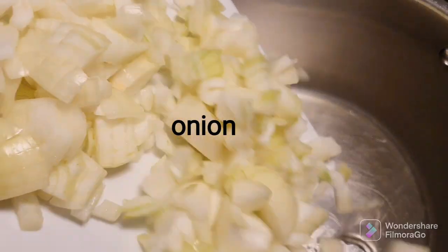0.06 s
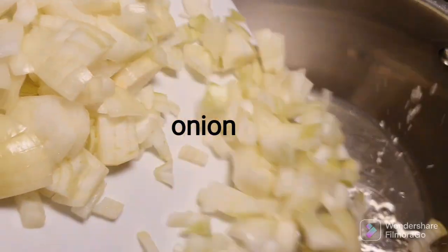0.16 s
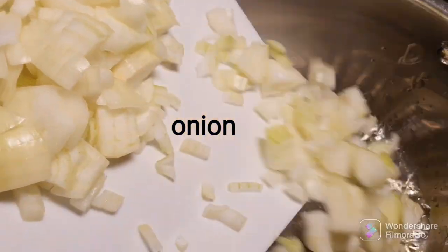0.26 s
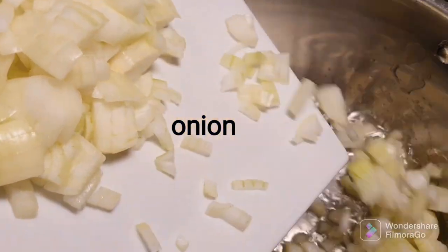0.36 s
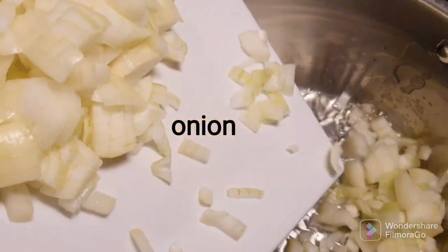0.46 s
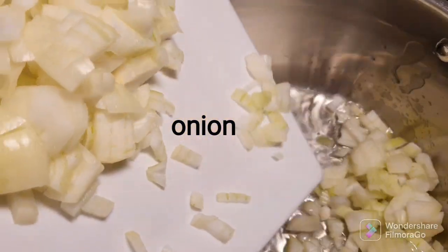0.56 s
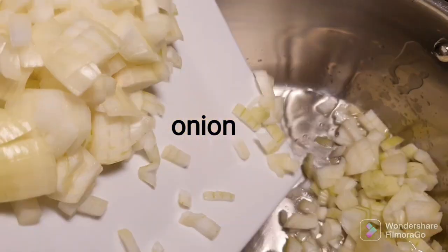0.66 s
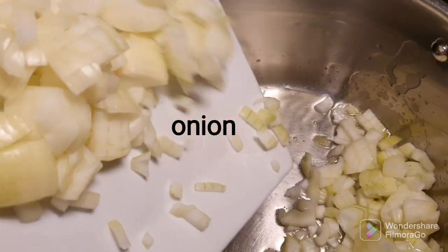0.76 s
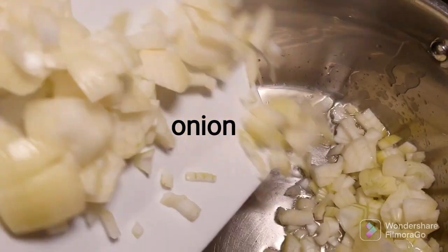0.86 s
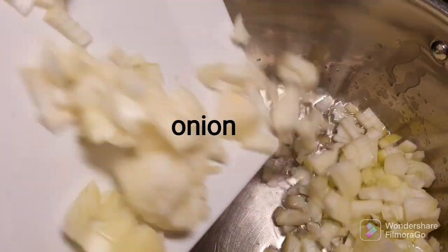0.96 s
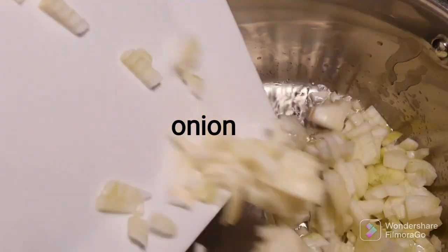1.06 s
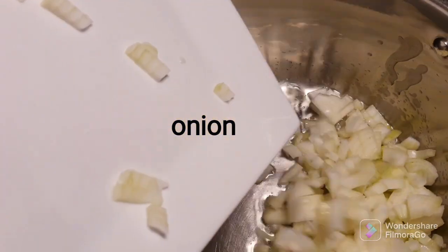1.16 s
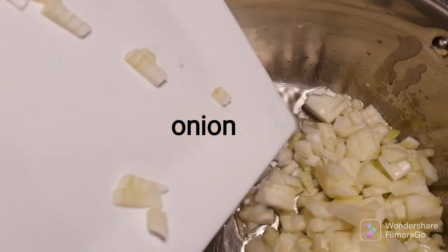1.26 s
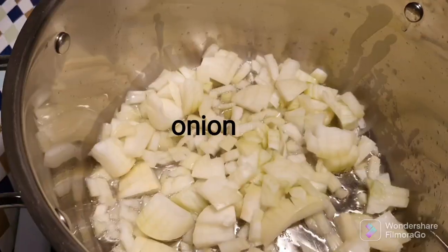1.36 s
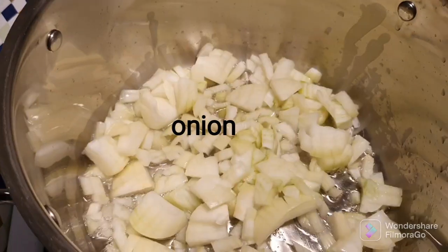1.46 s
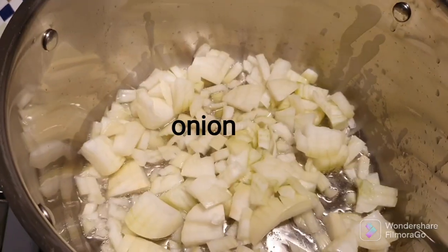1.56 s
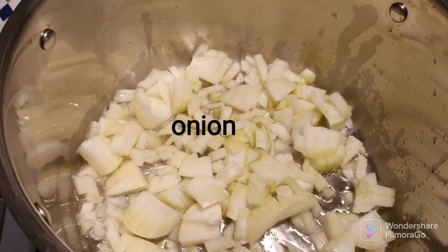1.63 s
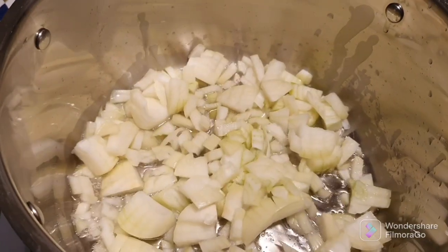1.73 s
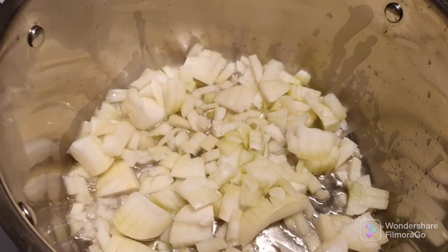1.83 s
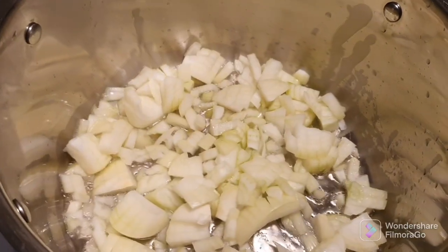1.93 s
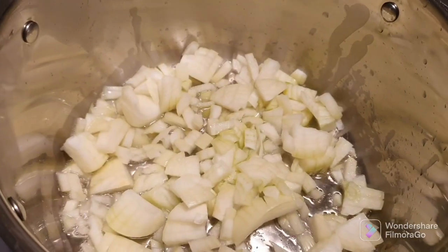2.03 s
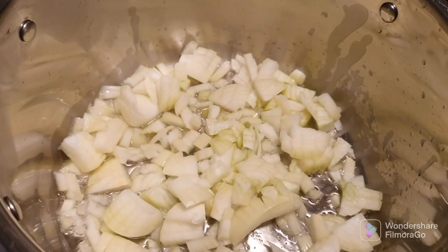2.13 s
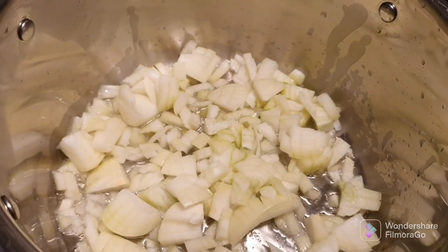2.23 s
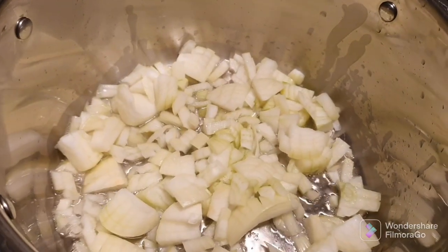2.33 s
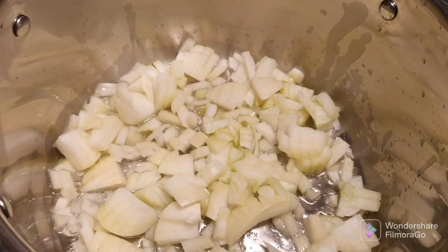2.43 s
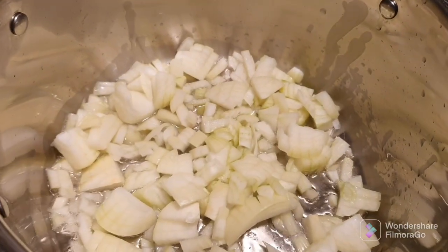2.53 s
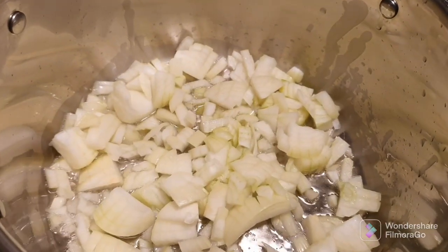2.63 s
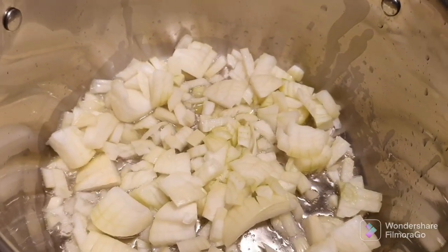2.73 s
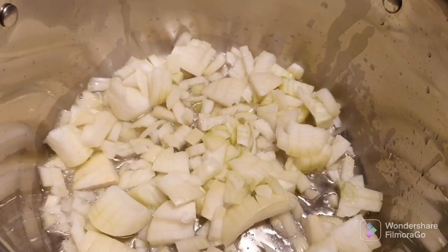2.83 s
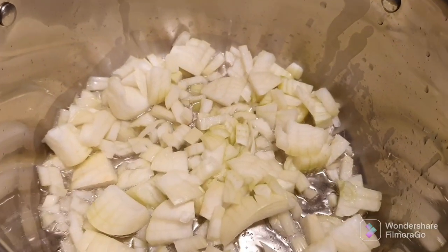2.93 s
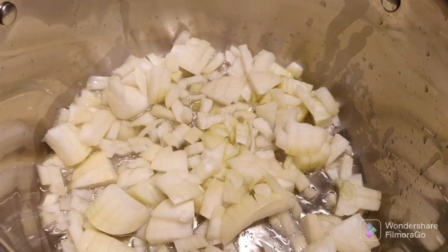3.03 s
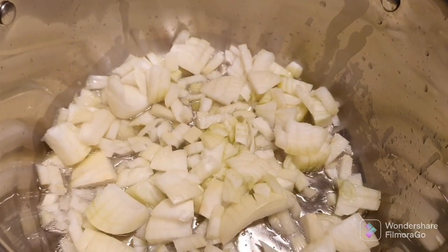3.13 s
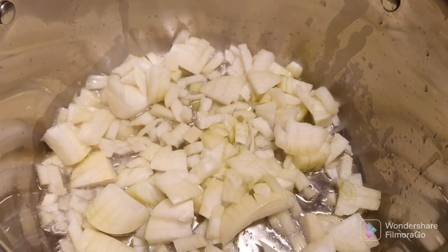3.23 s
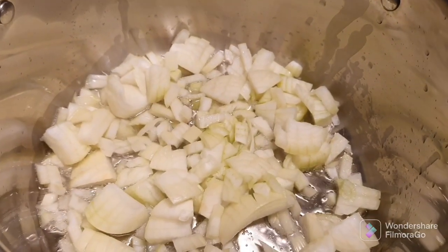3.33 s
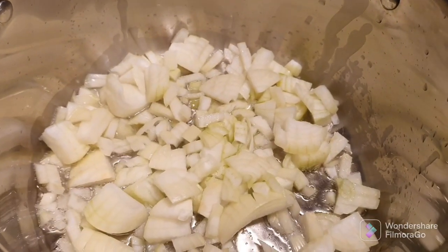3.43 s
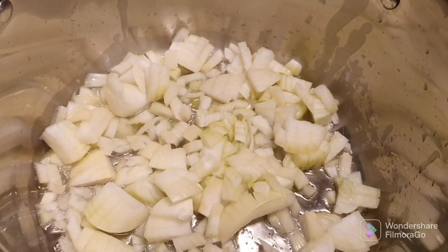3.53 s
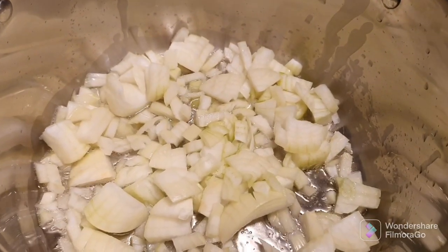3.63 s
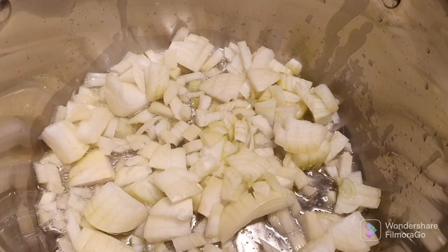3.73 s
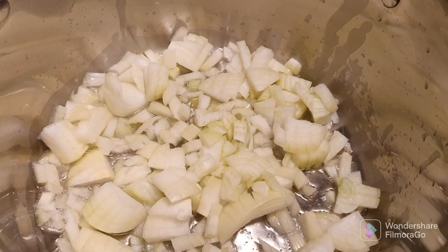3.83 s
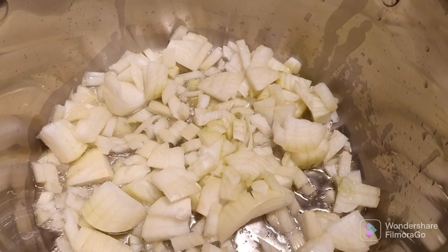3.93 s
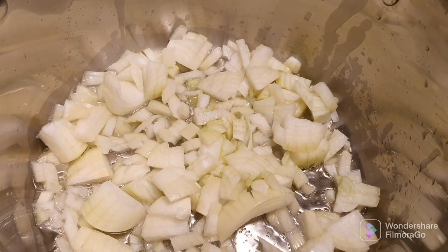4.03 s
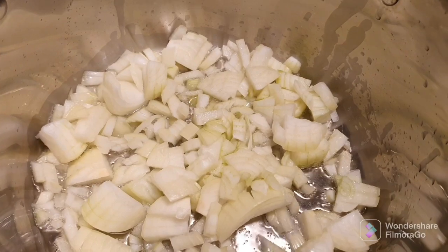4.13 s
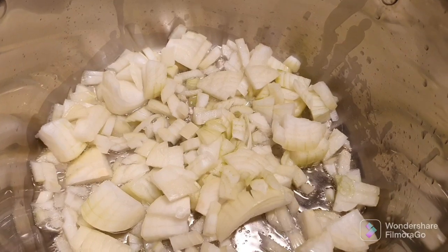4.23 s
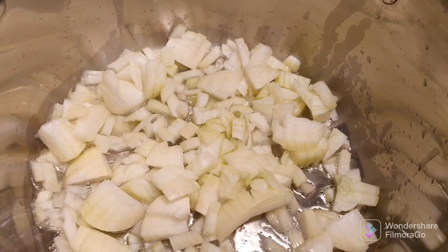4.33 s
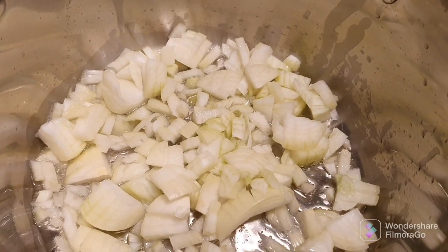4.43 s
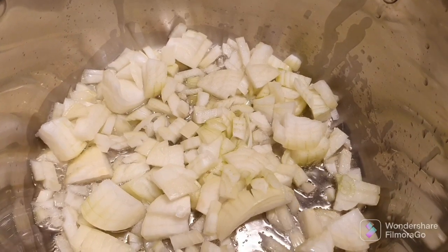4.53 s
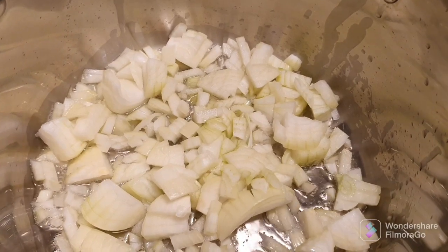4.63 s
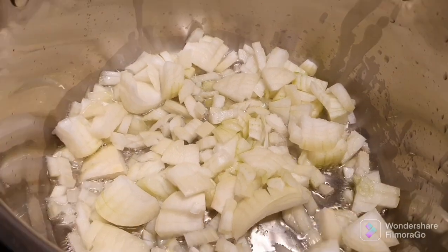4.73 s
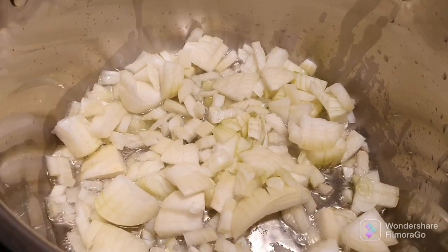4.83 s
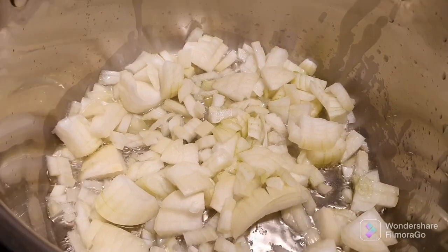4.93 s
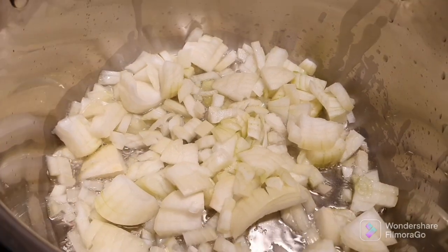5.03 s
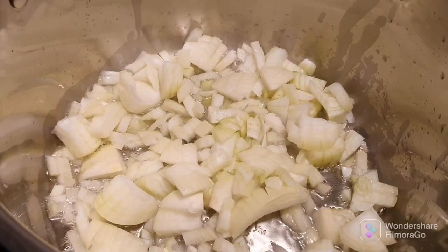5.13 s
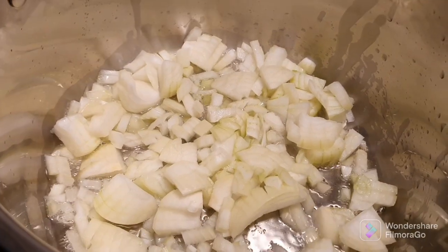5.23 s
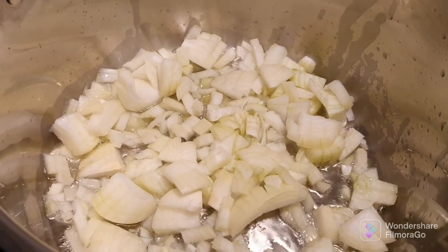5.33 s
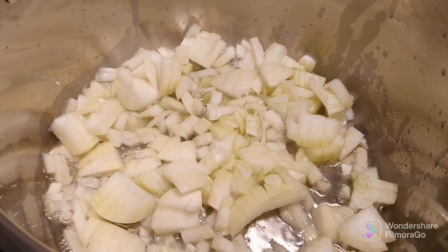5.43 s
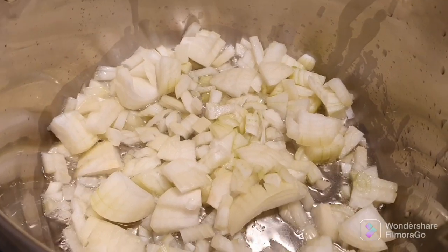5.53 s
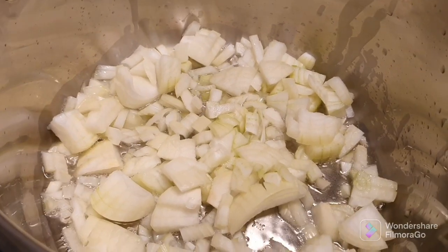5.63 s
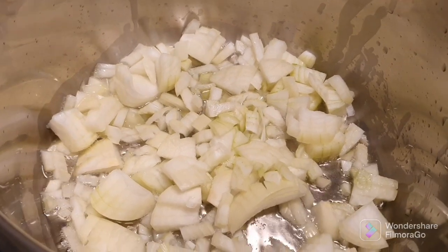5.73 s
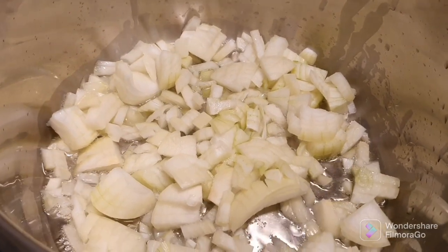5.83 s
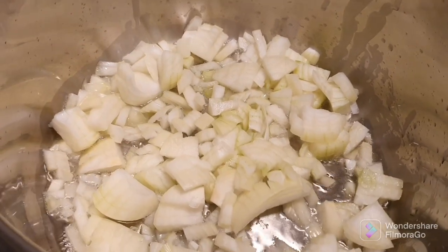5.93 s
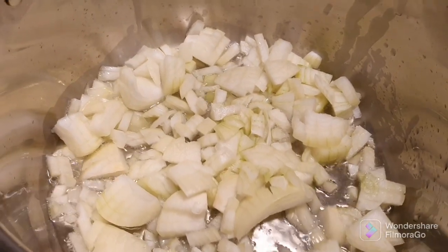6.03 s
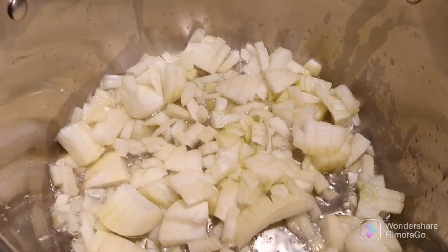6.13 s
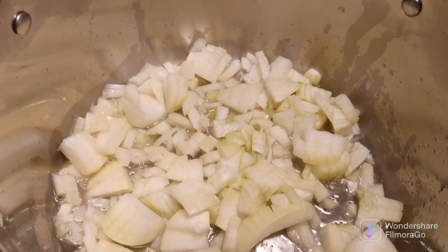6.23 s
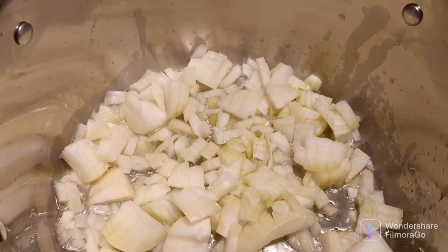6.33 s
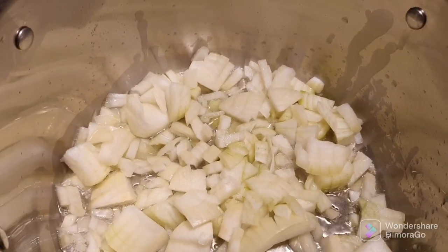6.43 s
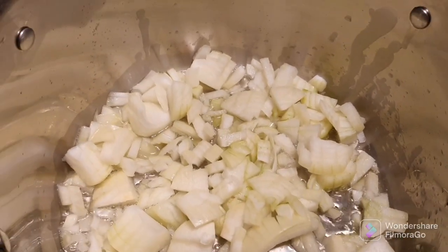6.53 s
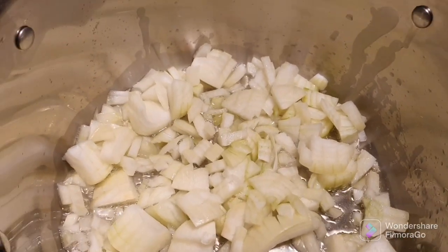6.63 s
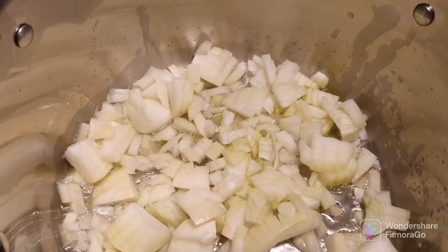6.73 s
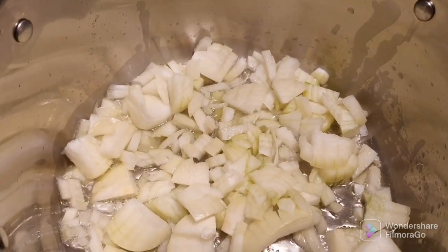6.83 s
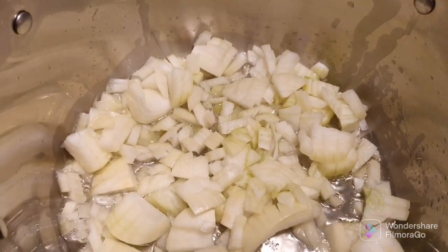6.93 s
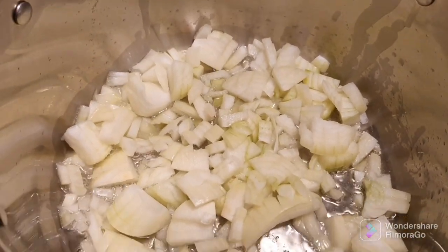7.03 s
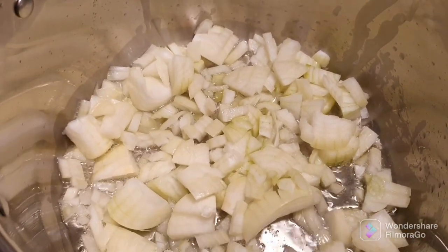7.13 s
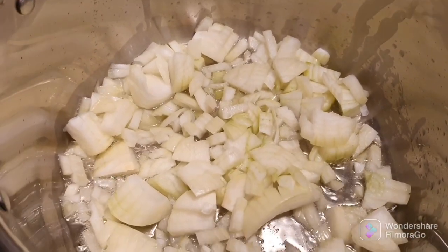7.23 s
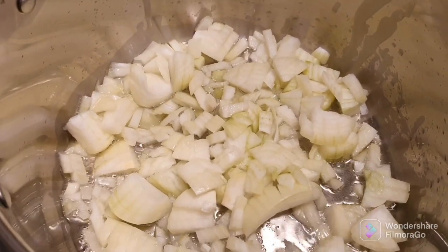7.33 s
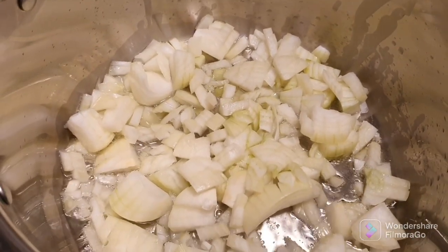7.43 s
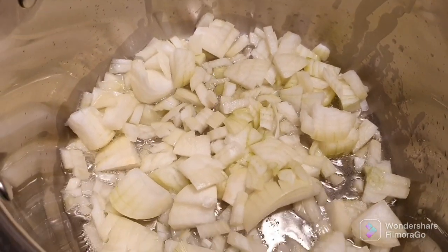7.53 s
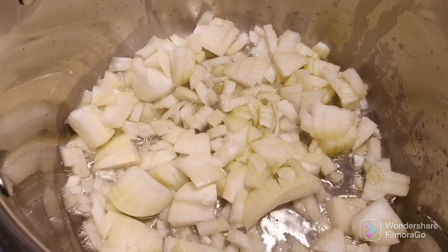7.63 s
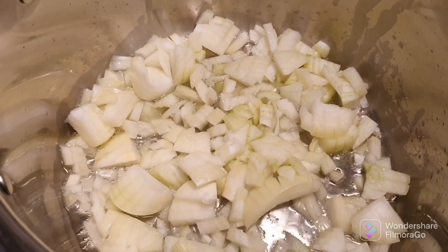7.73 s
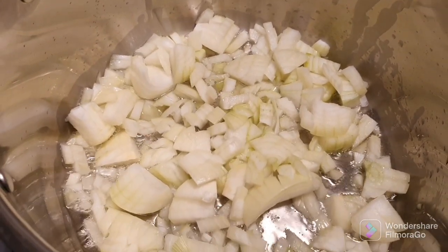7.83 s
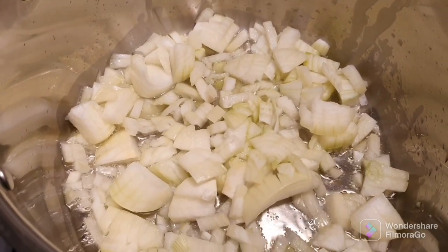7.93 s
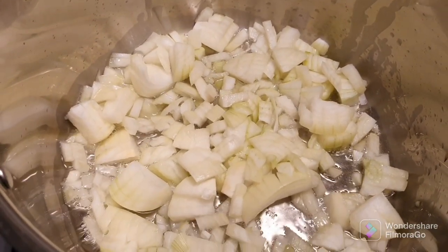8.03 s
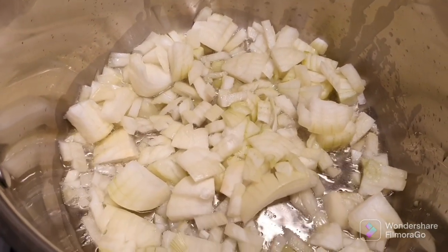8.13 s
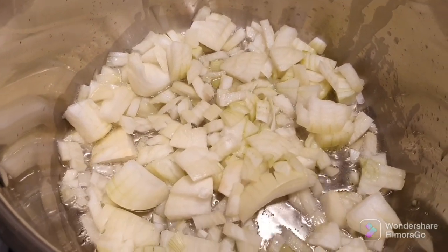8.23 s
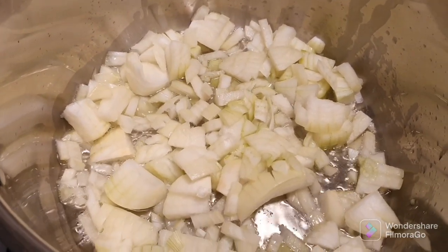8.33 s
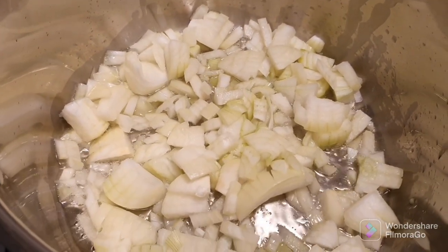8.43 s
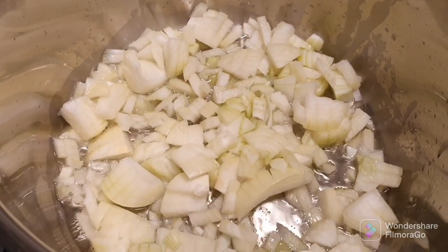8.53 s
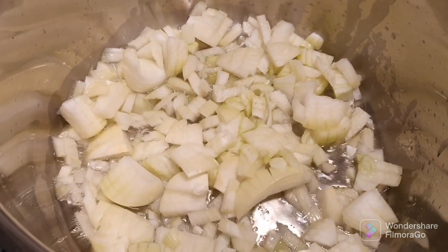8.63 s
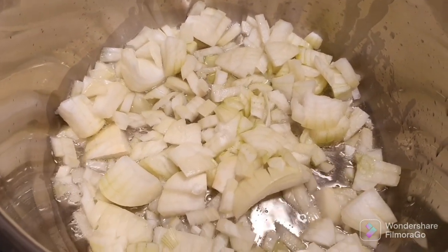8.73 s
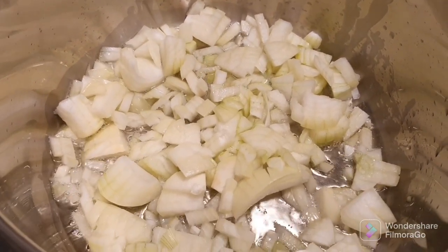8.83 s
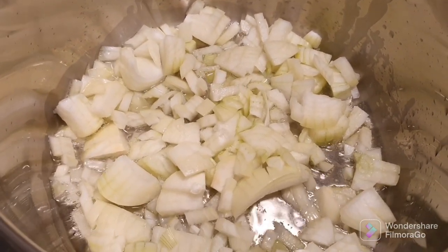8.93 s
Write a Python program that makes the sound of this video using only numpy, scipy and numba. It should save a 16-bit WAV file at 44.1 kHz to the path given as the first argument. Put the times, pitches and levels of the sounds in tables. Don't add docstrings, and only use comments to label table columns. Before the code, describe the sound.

Just above the rim of a metal pot, a quiet burner rumble and delicate ticks give way to onion tumbling into oil. Soft thuds, sputtering and a loud sharp metallic knock come within the first second, followed by flaring splashes. The sizzle then drops slightly and stays dense and bright, with bubble snaps, spits and faint airy whistling; a very brief dropout precedes a slightly different steady frying.

```python
import sys
import numpy as np
from scipy import signal
from scipy.fft import rfft, irfft, next_fast_len
from scipy.io import wavfile
from scipy.ndimage import uniform_filter1d, minimum_filter1d
from numba import njit

SR = 44100
rng = np.random.default_rng(int(sys.argv[2]) if len(sys.argv) > 2 else 0)


def level_to_linear(level):
    exponent = np.asarray(level, float) / 20
    return 10 ** exponent


def file_out(sig):
    cols = np.atleast_2d(sig).T
    lim = np.clip(cols, -1, 1)
    pcm = np.round(lim * 32767).astype(np.int16)
    wavfile.write(sys.argv[1], SR, pcm)


N = 395577

CHANGES_S = (1.745, 4.76)
# from t/s, to t/s
SILENCE_S = (4.7415, 4.7772)

# f/Hz, level/dB per Hz
BURNER = [(18, -43), (30, -46), (49, -4), (76, -17.5), (108, -4.5), (156, -16), (172, -13), (186, -13),
          (214, 1), (269, -11), (337, -9), (440, 2), (620, -17), (810, -55), (1360, -120)]
BURNER_DB, BURNER_BASS_DB = (-57.5, -59, -58.5), (2, 0, 2)

# f/Hz, level/dB per Hz
TIPPING_FIZZ = [(330, -33), (560, -30), (850, -28.5), (977, -8.5), (1420, -15), (1990, -4.5), (2550, 1.5),
                (3240, 3.5), (3720, -1), (4780, 0), (7670, -19), (12800, -28), (15600, -38)]
# f/Hz, level/dB per Hz
SECOND_VIEW_FIZZ = [(330, -43), (560, -27), (912, -17.5), (991, -14), (1270, -16.5), (1500, -10.5),
                    (1880, -11), (1960, -12.5), (2940, -2.5), (4980, -2.5), (7890, -22.5), (15600, -33.5)]
# f/Hz, level/dB per Hz
FRYING_FIZZ = [(330, -28), (560, -28), (899, -16.5), (991, -10.5), (1240, -14), (1480, -6), (1710, -10),
               (3020, -2), (4980, -7), (7890, -25.5), (12700, -30), (15600, -39)]
# f/Hz, width/Hz, boost/dB
POT_AIR = [(993.6, 43, 6.5), (1507, 54, 5), (1853, 56, 9), (2035, 28, 5), (2490, 33, 5.5), (2940, 27, 0),
           (3100, 36, -0.5), (3630, 64, 1.5), (4800, 55, 0)]
# f/Hz, lead/rad
LEAD_TIPPING = [(345, 0), (1030, 1.3), (2400, 3.9), (2800, 2.1), (4130, 4.2), (4820, 7.1), (5860, 9.3),
                (7000, 7.9)]
# f/Hz, lead/rad
LEAD_FRYING = [(345, -.4), (1030, -.7), (1400, -2.2), (2760, -.8), (3300, 2.5), (4800, 3.6), (5500, 1.7),
               (7000, 1.6)]
# t/s, level/dB
BOIL = [(0, -57), (.11, -64), (.24, -41.5), (.3, -37), (.42, -32.5), (.46, -31), (.72, -31.5), (.99, -35),
        (1.2, -32), (1.72, -32), (1.76, -36.5), (3.6, -36), (4.73, -35.5), (5.76, -36.5), (6.52, -34.5),
        (7.21, -35.5), (8.27, -34), (8.97, -34.5)]
# t/s,
# flare/dB, fade/s
SPLASHES = [(.278, 3, 0.023), (.332, 2, 0.023), (.425, 2.5, 0.042), (.6, 3.5, 0.031), (1.008, 9.5, 0.042),
            (1.11, 8, .02), (1.19, 8.5, 0.024), (1.213, 9, 0.0092), (1.255, 4, 0.026), (1.41, 0, .04),
            (1.71, 3, 0.035), (2.18, 5, 0.016), (7.6, 3, 0.029)]
# t/s, level/dB
SURGES = [(.58, -0.5), (.66, -1), (.97, -1.5), (1.07, 0), (1.14, -1.5), (1.17, 2), (1.29, 1), (1.39, -2),
          (1.88, 0), (1.96, -1), (2.05, -0.5), (2.24, -2), (2.38, -1.4), (2.73, -1.5), (2.96, 0.3),
          (3.13, 0), (3.27, 1), (3.45, -1.5), (3.73, 1.4), (4.48, 1), (4.6, 0), (5.14, -1.5), (5.4, -1.3),
          (5.72, -1.6), (5.92, 1), (6.93, 1), (7.95, -1.6), (8.31, 0), (8.45, 2), (8.56, -0.8), (8.62, 1),
          (8.7, 0.5)]
# t/s, left minus right level/dB
DRIFT = [(0, 1.5), (.7, 0.5), (1.6, -.5), (2.2, 0.5), (3.7, -1), (4.7, .5), (5.7, 1), (6.5, 0), (8, 0),
         (8.97, 0.5)]
# t/s, peak level/dB
SPITS = [(0.3088, -46), (0.4216, -37), (0.4809, -44), (0.5687, -37), (0.6391, -45), (0.7264, -27),
         (0.8047, -51), (0.8441, -35), (0.8795, -37), (0.9538, -35), (0.9853, -35), (1.0686, -38),
         (1.108, -36), (1.1803, -35), (1.4038, -33), (1.4357, -32), (1.4916, -37), (1.5699, -36),
         (1.6772, -39), (1.772, -42), (2.0015, -41), (2.1212, -40), (2.1586, -44), (2.851, -43),
         (3.5948, -49), (3.9156, -53), (4.0294, -48), (4.1426, -43), (4.384, -55), (4.6904, -40),
         (4.8407, -40), (5.0518, -47), (5.1011, -42), (5.2239, -43), (5.3147, -45), (5.3855, -42),
              (5.4713, -44), (5.5831, -42), (5.8085, -42), (6.1263, -50), (6.5139, -49), (6.5833, -44),
              (6.6691, -46), (6.7554, -47), (6.8651, -43), (6.9998, -41), (7.137, -42), (7.3196, -43),
              (7.4274, -43), (7.5246, -44), (7.7651, -41), (7.798, -50), (7.9671, -48), (8.1582, -39),
              (8.4939, -42), (8.668, -43), (8.7254, -41), (8.7678, -45), (8.8112, -39), (8.912, -36)]
# f/Hz, width/Hz, from t/s, to t/s, level/dB against the fizz
POCKETS = [
    (3000, 71, 4.7, 5.7, -3),
    (2480, 100, 5.6, 3.7, -15),
    (2950, 99, 7.2, 7.2, -7),
    (3000, 160, 7.4, 7.9, -10),
    (4000, 530, 7.5, 11, -5.5),
    (2460, 70, 8.1, 7.8, -13),
]
DEEP_DB, STEAM_DB = (6, 2.5, 1), (2.5, 1, 0)
DEEP_FLARE, STEAM_FLARE = 0.19, 0.48
ROLLING_DB, DEEP_SLOPE, STEAM_SLOPE = -36.5, -0.65, 0.45
SPIT_UNDER_BOIL_DB, SPIT_FADE_S, SPIT_MID_SHARE = -10.5, 0.025, 0.14

# t/s, peak
# level/dB, f/Hz, t60/s
TAPS = [(.003, -46, 2550, .2), (.042, -37, 3530, 0.039), (.048, -44, 1830, 0.13), (.086, -43, 1850, .1),
        (.108, -38, 1150, .05), (.134, -36, 4950, .06), (.183, -28, 1900, .02), (.19, -34, 3480, .02),
        (.19, -36, 6500, 0.017), (.2, -38, 4800, .03), (0.297, -31, 1240, 0.052), (0.334, -23, 3200, 0.11),
        (.352, -36, 980, .08), (.438, -28.5, 985, 0.072), (.649, -35, 1000, .04), (.727, -16, 4850, .08),
        (.726, -32, 172, .2), (3.9177, -15, 5500, 0.0066), (6.925, -30, 4800, .09),
        (.728, -26.5, 382, 0.24), (.765, -23, 2470, .25), (.801, -22, 3560, .04), (1.03, -34, 1000, .06),
        (1.105, -31, 1000, .04), (1.134, -31, 790, .02), (1.189, -31, 1070, .05), (1.215, -21, 1860, 0.056),
        (1.241, -28, 4300, .07), (1.255, -34, 1020, .06), (1.295, -33, 1100, .03),
        (1.718, -32, 1000, 0.051), (3.9168, -29, 1600, .004)]
# t/s, peak level/dB, dullness/dB per octave, share of free ring time, rattle/s
KNOCKS = [(0.044, -43, -2, 0.64, 0.01), (.108, -34.5, -4, .4, 0.0087), (.129, -28, -2, 0.39, 0.05),
          (0.183, -36, -9, 0.36, .008), (0.22, -34, 3.5, 0.57, 0.0092), (.248, -21, -6.5, 0.29, 0.015),
          (.291, -34, 3, 0.58, 0.012), (0.723, -2.5, -1.5, 1, 0.0079), (0.7265, -13.5, -2.5, .4, 0.014),
          (0.747, -24, 5, .5, 0.011), (0.766, -17, -2, 0.63, 0.0098), (.801, -13.5, 0, 0.48, 0.015),
          (.816, -23, -2, .4, .008), (1.008, -30, -13, 0.3, 0.046), (1.114, -33.5, 4, 0.73, 0.013),
          (1.214, -28, -5, 0.3, 0.013), (1.705, -36, 2, 0.3, 0.0062), (1.726, -27.5, 1, 0.2, 0.012),
          (4.47, -31, 1.5, 0.3, 0.015)]
# f/Hz, level/dB, t60/s
WALL_MODES = [(170, -12.5, 0.19), (312, -26, 0.1), (384, -12, 0.53), (535, -9.5, 0.23), (575, -22, 0.097),
              (700, -11, 0.045), (761, -12.5, 0.31), (786, -16, 0.56), (905, -9.5, 0.35),
              (1000, -14.5, 0.49), (1130, -22, 0.06), (1345, -12, 0.48), (1628, -10, 0.15),
              (1838, -0.5, 0.12), (2103, 2, 0.14), (2350, -14, .2), (2510, -17, .14), (2440, -7.5, 0.68),
              (2670, -7, 0.14), (3300, -5, .09), (3580, -2, 0.083), (4850, -7.5, 0.082), (5250, -23, 0.08),
              (5600, -10.5, 0.2), (6200, -12, 0.23), (6800, -13, 0.093)]
# t/s, level/dB, fade/s
SHEENS = [
    (.108, -60, .015),
    (.129, -56, 0.032),
    (.17, -57, .05),
    (.2475, -39, 0.012),
    (.7235, -40, .016),
    (.8, -54, .02),
]
# t/s, thud level/dB, pot floor ring level/dB
CLUMPS = [(.125, -37, -39.5), (.155, -36, -46), (.235, -39, -44), (.295, -37, -38), (.35, -40, -55),
          (0.382, -35, -38), (.44, -32, -40.5), (.475, -49, -54), (.53, -45, -54), (.575, -51, -55),
          (.62, -58, -66), (0.721, -42, -31), (.795, -36, -40), (0.879, -58, -38.5), (1.003, -37, -43),
          (1.08, -38, -39.5), (1.15, -43, -51), (1.19, -28.5, -42.5), (1.27, -43, -54), (1.36, -66, -64)]
# t/s, peak level/dB, f/Hz, t60/s, spray level/dB
POPS = [(0.2478, -22, 4000, 0.018, 2), (0.249, -27, 3000, 0.011, 5), (0.2806, -21, 6200, 0.011, 2.5),
        (0.844, -11.5, 4400, 0.01, -2), (1.7062, -22, 3150, 0.027, 4), (1.2142, -15, 4360, .006, -8),
        (1.8493, -11, 4500, 0.0043, -32), (1.8493, -13, 3200, 0.0024, -35), (2.1852, -17, 3350, 0.0093, -8),
        (2.9487, -25, 4000, 0.0091, -12), (3.9158, -20, 4000, .003, -25), (3.9168, -6, 2950, 0.0038, -14),
        (3.9164, -14, 4300, .0025, -22), (3.9164, -12.5, 5600, .004, -20), (3.9195, -20, 5100, .006, -20),
        (4.136, -32, 3000, 0.011, -10), (6.9194, -28, 4800, 0.04, 2), (6.928, -35, 5000, 0.053, -12),
        (7.6135, -26, 5030, .008, -10), (7.627, -17, 3300, .004, -15), (7.6286, -13, 3300, 0.008, -12),
        (7.632, -14.5, 3000, 0.0098, -14), (7.660, -28, 3000, 0.022, -6), (7.668, -26, 2950, .015, -8),
        (8.7164, -25, 3000, .012, -10)]
STRIKE_S = 0.7228
# f/Hz, level/dB, t60/s
STRIKE_MODES = [
    (547, -10, 0.024),
    (884, -8.5, 0.029),
    (1447, -12.5, 0.028),
    (1996, -8.5, 0.038),
    (3570, -9, 0.022),
    (5600, -10, .025),
]
# f/Hz, left minus right level/dB
PORTS = [(300, -0.7), (700, 3), (1500, 0.3), (2600, -4.5), (3600, -5.5), (4150, -5.5), (4650, 4.5),
         (5200, 11.5), (6500, 6.5), (7900, 11), (8950, -4), (10300, 4), (12000, -5.5), (15500, -11)]

TIME = np.arange(N) / SR
VIEW = np.searchsorted(CHANGES_S, TIME)
SIZE = next_fast_len(N + 8192)
FREQ = np.maximum(np.fft.rfftfreq(SIZE, 1 / SR), 1)
SOFT = 1 / np.sqrt(1 + (FREQ / 5600) ** 10)


def level(x, db=0):
    return x * level_to_linear(db) / np.sqrt(np.mean(x ** 2))


def along(table):
    s, value = np.transpose(table)
    return np.interp(TIME, s, value)


def across(table):
    hz, value = np.transpose(table)
    return np.interp(np.log(FREQ), np.log(hz), value)


def shape(x, gain):
    return irfft(rfft(x, SIZE) * gain, SIZE)[..., :N]


def walk(rate):
    k = int(SR / rate)
    held = np.repeat(rng.standard_normal(N // k + 1), k)
    return uniform_filter1d(uniform_filter1d(held, k), k)[:N]


def swell(s, rise_s, fade_s):
    since = np.maximum(TIME - s, 0)
    return (1 - np.exp(-since / rise_s)) * np.exp(-since / fade_s)


def pair(alike_hz):
    alike = 1 / (1 + (FREQ / alike_hz) ** 2)
    mid, side = rng.standard_normal((2, N))
    mid = shape(mid, np.sqrt((1 + alike) / 2))
    side = shape(side, np.sqrt((1 - alike) / 2))
    return mid + side * np.array([[1], [-1]])


@njit
def rings(s, hz, t60, size, phase, rise_s):
    out, rise = np.zeros((2, N)), np.exp(-1 / (rise_s * SR))
    for k in range(len(s)):
        turn = np.exp(2j * np.pi * hz[k] / SR - np.log(1000) / (t60[k] * SR))
        left = size[0, k] * np.exp(1j * phase[0, k])
        right = size[1, k] * np.exp(1j * phase[1, k])
        start, shut = int(s[k] * SR), 1.
        for i in range(start, min(N, start + int(.8 * t60[k] * SR))):
            shut *= rise
            out[0, i] += left.imag * (1 - shut)
            out[1, i] += right.imag * (1 - shut)
            left *= turn
            right *= turn
    return out


def heard(s, hz, t60, db, alike_hz=724.0, lag_s=0.00014, scatter_db=0.5, rise_s=0.00043, loose=3.0):
    apart_chance, phase_chance, size_chance = rng.standard_normal((len(s), 3)).T
    apart = 2 * np.pi * hz * lag_s + np.minimum(hz / alike_hz, 1.6) * apart_chance
    phase = loose * phase_chance + np.array([apart, -apart]) / 2
    size = level_to_linear(db + scatter_db * np.array([size_chance, -size_chance]))
    return rings(s, hz, t60, size, phase, rise_s)


def burner():
    hum = level(shape(pair(alike_hz=503), level_to_linear(across(BURNER))))
    bass = shape(hum, 1 / (1 + (FREQ / 150) ** 6))
    hum = hum - bass + bass * level_to_linear(np.take(BURNER_BASS_DB, VIEW))
    return hum * level_to_linear(np.take(BURNER_DB, VIEW) + 3.5 + 0.47 * walk(6.5))


def crackle(count=15000, spread_db=3.0):
    when, rare, sign = rng.random((count, 3)).T
    size = np.sign(sign - .5) * level_to_linear(-spread_db * np.log(rare + .002))
    clicks = np.bincount((when * N).astype(int), size, N)
    return level(shape(clicks, (FREQ > 500) * (SOFT + 0.86)))


def sputter(s, size, fade_s):
    kicks = np.bincount((s * SR).astype(int), size, N)[:N]
    return signal.lfilter([1], [1, -np.exp(-1 / (fade_s * SR))], uniform_filter1d(kicks, size=500))


def resonance(hz, width):
    return 1 / (1 + (2 * (FREQ - hz) / width) ** 2)


def fizz(count=42000, snap_db=-7.0, ring_s=0.056):
    when, size, rare, life = rng.random((count, 4)).T
    bubbles = heard(when * N / SR, 500 + 15500 * size, ring_s * (1.47 + life), np.log(rare), lag_s=0)
    raw = level(bubbles) + level(pair(alike_hz=650)) + level_to_linear(snap_db) * crackle()
    air_db = sum(db * resonance(hz, width) for hz, width, db in POT_AIR)
    views = ((TIPPING_FIZZ, LEAD_TIPPING), (SECOND_VIEW_FIZZ, LEAD_FRYING), (FRYING_FIZZ, LEAD_FRYING))
    out = 0
    for k, (colour, lead) in enumerate(views):
        turn = np.exp(np.array([[-.5j], [.5j]]) * across(lead))
        out = out + (VIEW == k) * level(shape(raw, level_to_linear(across(colour) + air_db) * turn))
    return out


def sizzle():
    source, boil_db = fizz(), along(BOIL)
    flare_db = sum(db * swell(s, 0.0026, fade_s) for s, db, fade_s in SPLASHES)
    slack_db = np.minimum(boil_db - ROLLING_DB, 0) * (VIEW == 0)
    deep_db = np.take(DEEP_DB, VIEW) + DEEP_SLOPE * slack_db + DEEP_FLARE * flare_db
    steam_db = np.take(STEAM_DB, VIEW) + STEAM_SLOPE * slack_db + STEAM_FLARE * flare_db

    s, peak_db = np.transpose(SPITS)
    over_db = np.clip(peak_db - np.interp(s, TIME, boil_db) - SPIT_UNDER_BOIL_DB, 0, 7)
    spit_db = sputter(s, over_db, SPIT_FADE_S)
    spit_db = spit_db + sputter(rng.random(size=300) * N / SR, 2.0 * rng.random(size=300), .012) - 2.0

    deep, fine = 1 / (1 + (FREQ / 1400) ** 4), 1 / (1 + (7000 / FREQ) ** 6)
    parts = [(deep, deep_db + 0.16 * walk(22)),
             (1 - deep - fine, flare_db + SPIT_MID_SHARE * spit_db),
             (fine, steam_db + 1.6 * walk(17) + spit_db)]
    for hz, width, start, end, db in POCKETS:
        live = np.clip(np.minimum(TIME - start, end - TIME) / 0.087, 0, 1)
        parts.append((resonance(hz, width), db - 30 * (1 - live) + 2.0 * walk(5.8)))

    sway_db = -0.1 * walk(8.2) + sum(db * np.exp(-((TIME - s) / 0.016) ** 2) for s, db in SURGES)
    sway_db = sway_db + np.array([[.5], [-.5]]) * along(DRIFT)
    return sum(shape(source, gain) * level_to_linear(db) for gain, db in parts) * level_to_linear(boil_db + 3.0 + sway_db)


def taps():
    s, db, hz, t60 = np.transpose(TAPS)
    return heard(s, hz, t60, db + 1.0, alike_hz=4000., lag_s=-0.00017, rise_s=0.00078)


def knocks(scatter_db=1.0, rattle_db=-8.5, ring_db=-10.0):
    hz, mode_db, t60 = np.transpose(WALL_MODES)
    hz = np.r_[hz, hz * (1 + .03 * rng.standard_normal(len(hz)))]
    mode_db, t60 = np.r_[mode_db, mode_db - 7], np.r_[t60, .55 * t60]
    out, rattle = 0, np.zeros(N)
    for s, db, dull_db, free, rattle_s in KNOCKS:
        mix_db = db + ring_db + mode_db - dull_db * np.log2(hz / 1500)
        mix_db = mix_db + scatter_db * rng.standard_normal(len(hz))
        start = s + 0.0003 * rng.random(len(hz))
        out = out + heard(start, hz, free * t60, mix_db, alike_hz=3000., lag_s=-0.00018, loose=0.98)
        rattle += (TIME >= s) * level_to_linear(db + rattle_db) * np.exp(-np.maximum(TIME - s, 0) / rattle_s)
    s, db = np.transpose(KNOCKS)[:2]
    out = out + heard(s, 564 + 0 * s, 0.033 + 0 * s, 2.0 * db - 10, alike_hz=3000., lag_s=-0.00018)
    band = 1 / np.sqrt((1 + (450 / FREQ) ** 4) * (1 + (FREQ / 3500) ** 2))
    noise = shape(rattle * pair(alike_hz=1200), band * (SOFT + level_to_linear(-27)))
    return shape(out, SOFT) + level(noise, 20 * np.log10(np.std(rattle)))


def sheen():
    band = 1 / np.sqrt((1 + (7000 / FREQ) ** 8) * (1 + (FREQ / 12000) ** 6))
    hiss = level(shape(pair(alike_hz=2000), band))
    return hiss * sum(level_to_linear(db) * swell(s, 0.0014, fade_s) for s, db, fade_s in SHEENS)


def falling(count=3200, rise_s=0.017):
    when, size, rare, pitch = rng.random((count, 4)).T
    s = when * N / SR
    soft = 1 / np.sqrt((1 + (50 / FREQ) ** 4) * (1 + (FREQ / 500) ** 4))
    thuds = heard(s, 50 * np.exp(1.01 * size), 0.042 + 0 * s, 3 * rare,
                  alike_hz=900., scatter_db=1.0, rise_s=0.0018)
    clatter = heard(s, 250 * np.exp(1.4 * pitch), 0.017 + 0 * s, 6.0 * rare ** 3,
                    alike_hz=1200., scatter_db=3.5)
    thud_swell = sum(level_to_linear(db) * swell(s, rise_s, 0.029) for s, db, _ in CLUMPS)
    ring_swell = sum(level_to_linear(db) * swell(s, rise_s, 0.042) for s, _, db in CLUMPS)
    s, _, db = np.transpose(CLUMPS)
    plate = heard(s, 457 + 0 * s, 0.23 + 0 * s, db + 3.0, alike_hz=1500., rise_s=.003)
    return level(shape(thuds, soft), 1.3) * thud_swell + plate + level(clatter, -2.5) * ring_swell


def pops(count=8, spread=.13, echo_db=-20.0):
    s, db, hz, t60, spray_db = np.transpose(POPS)
    s = s + .0005
    crack_db = -16.5 - 0.52 * spray_db
    delay, detune = rng.random((len(s), 2, count)).transpose(1, 0, 2)
    spray_s = (s[:, None] + .009 * delay ** 2).ravel()
    spray_hz = (hz[:, None] * np.exp(spread * (4 * detune - 1.7))).ravel()
    spray = heard(spray_s, spray_hz, .009 + 0 * spray_s, np.repeat(db + spray_db, count))
    near = dict(alike_hz=8800.0, lag_s=.00002, scatter_db=-2.0)
    ring = heard(s, hz, t60, db + 5, **near)
    crack = heard(s, 4300 + 0 * s, .002 + 0 * s, db + 6 + crack_db, **near)
    echo = level_to_linear(echo_db) * np.exp(-2j * np.pi * FREQ * .003)
    return shape(ring + crack + spray, SOFT * (1 + echo) / np.sqrt(1 + (1700 / FREQ) ** 4))


def strike():
    hz, db, t60 = np.transpose(STRIKE_MODES)
    return heard(STRIKE_S + 0 * hz, hz, t60, db, alike_hz=20000., lag_s=.0001, rise_s=0.00098, loose=0.72)


def scene():
    return burner() + sizzle() + taps() + knocks() + sheen() + falling() + pops() + strike()


def limit(x, top=.98):
    room = np.minimum(top / (np.abs(x).max(axis=0) + 1e-9), 1)
    return x * uniform_filter1d(minimum_filter1d(room, size=129), size=65)


def band_limit(x):
    return signal.sosfilt(signal.butter(12, 15760, fs=SR, output="sos"), x)


def record(dry):
    lean = level_to_linear(across(PORTS))
    balance = np.sqrt(2 / (1 + np.array([1 / lean, lean]) ** 2))
    ports = shape(dry, balance * (FREQ < 15760))
    stop, start = SILENCE_S
    gate_s = [stop, stop + 0.002, stop + .017, stop + .019, start - .006, start - .0005, start]
    gate_db = np.interp(TIME, gate_s, [0, -40, -45, -120, -120, -36, 0])
    return band_limit(limit(ports * level_to_linear(gate_db)))


dry = scene()
out = record(dry)
file_out(out)
```